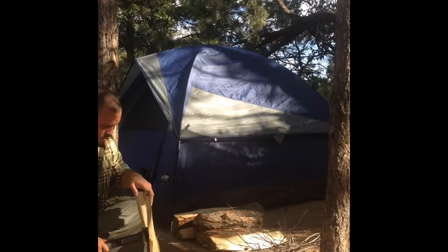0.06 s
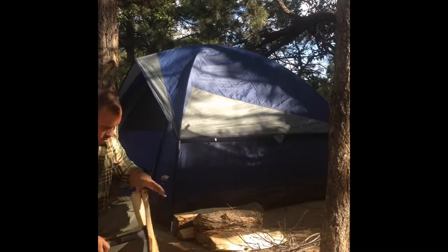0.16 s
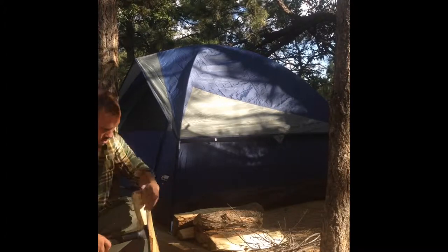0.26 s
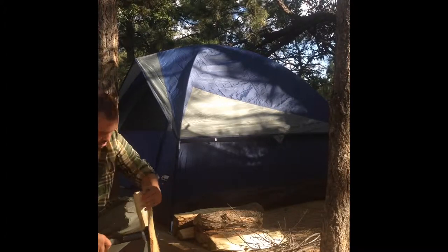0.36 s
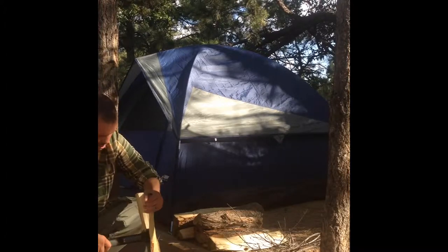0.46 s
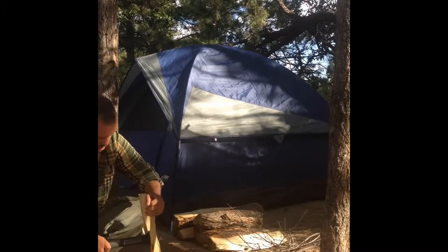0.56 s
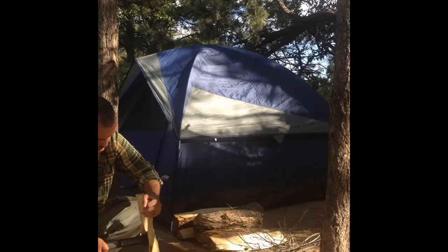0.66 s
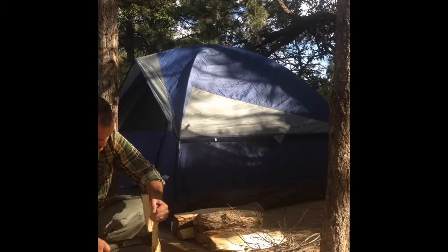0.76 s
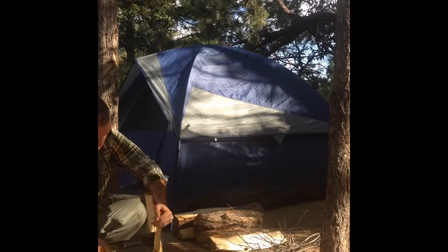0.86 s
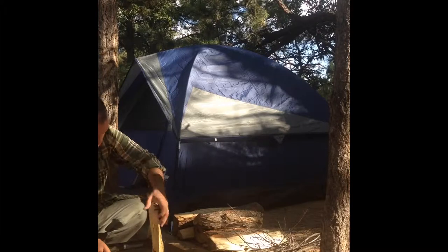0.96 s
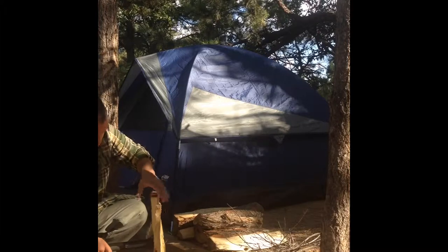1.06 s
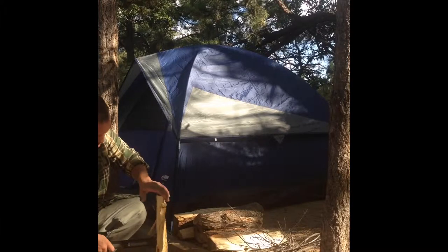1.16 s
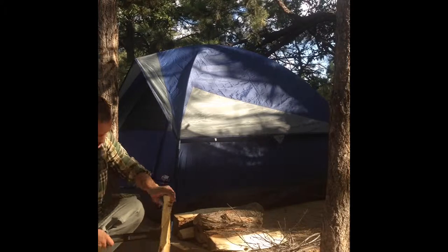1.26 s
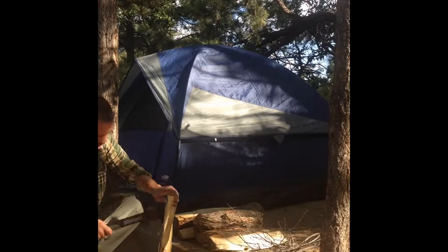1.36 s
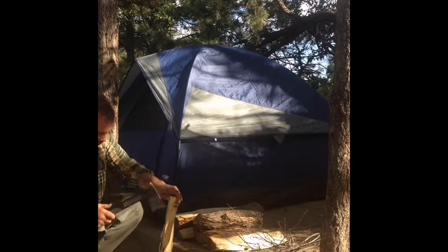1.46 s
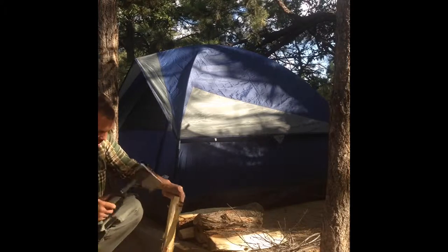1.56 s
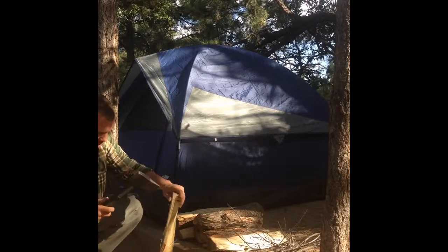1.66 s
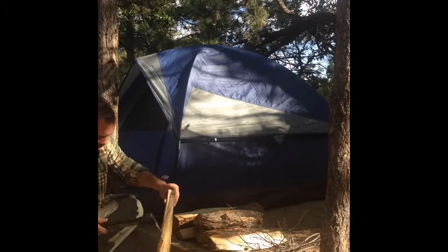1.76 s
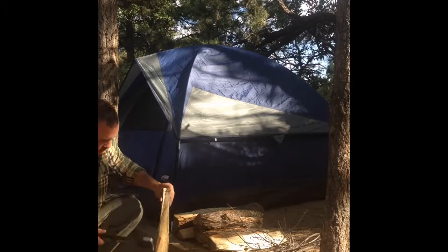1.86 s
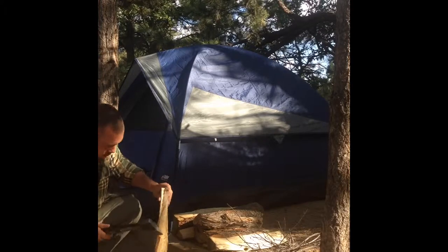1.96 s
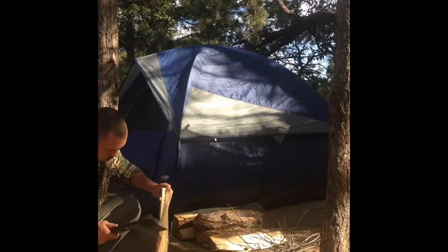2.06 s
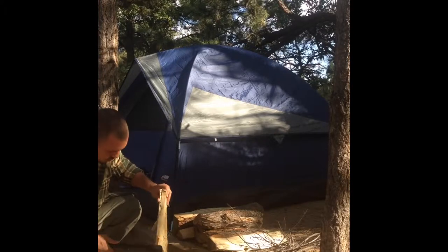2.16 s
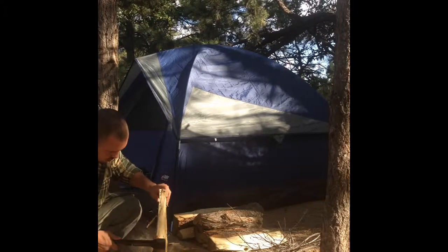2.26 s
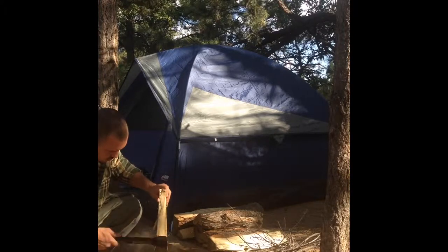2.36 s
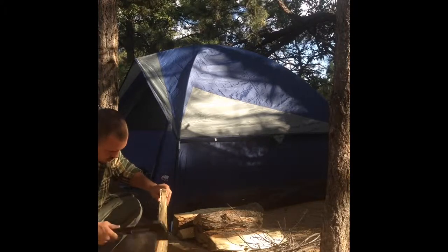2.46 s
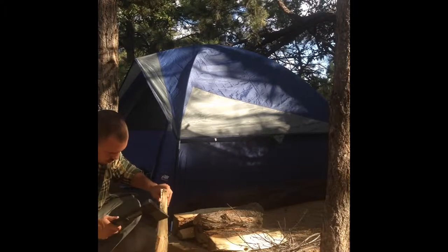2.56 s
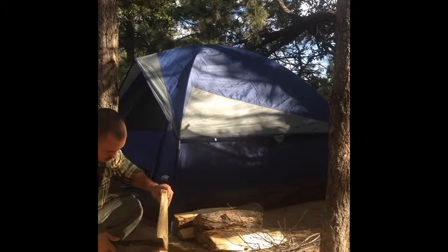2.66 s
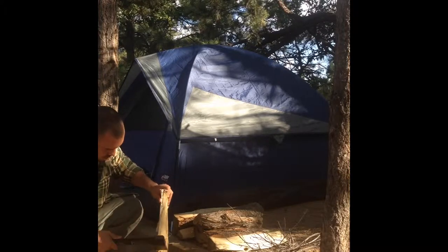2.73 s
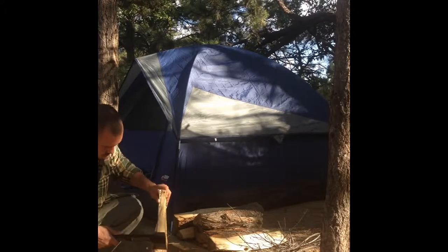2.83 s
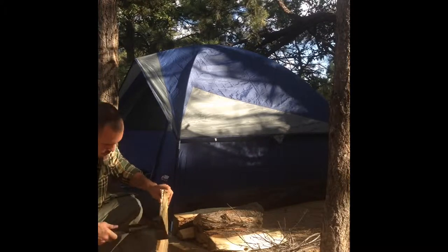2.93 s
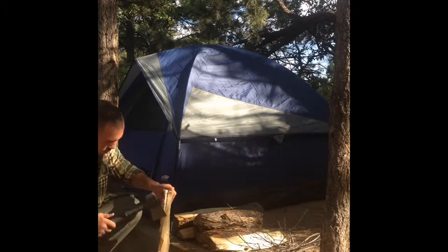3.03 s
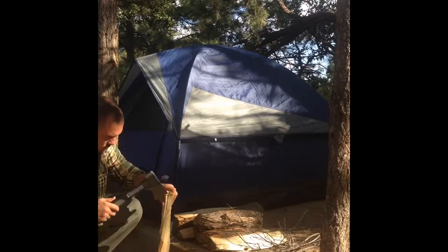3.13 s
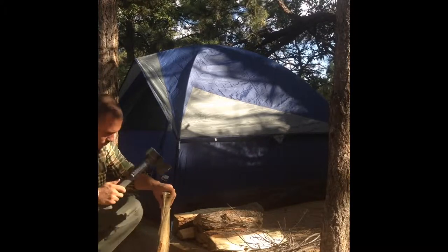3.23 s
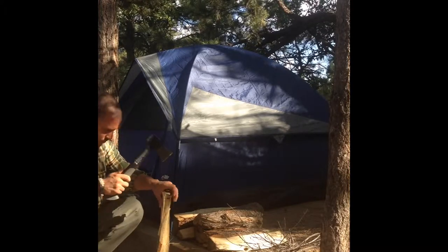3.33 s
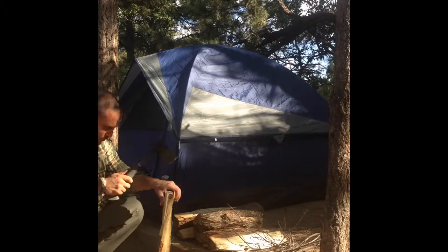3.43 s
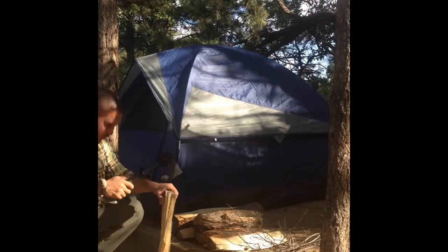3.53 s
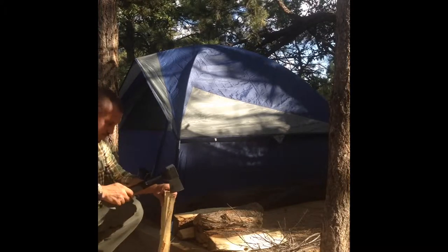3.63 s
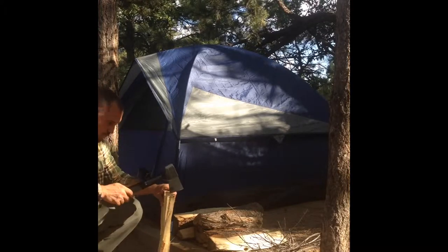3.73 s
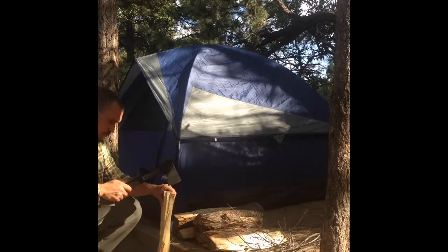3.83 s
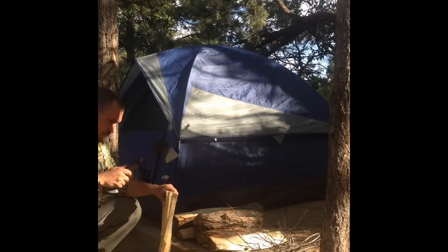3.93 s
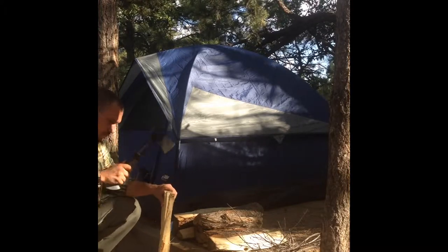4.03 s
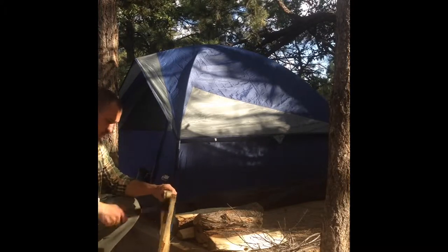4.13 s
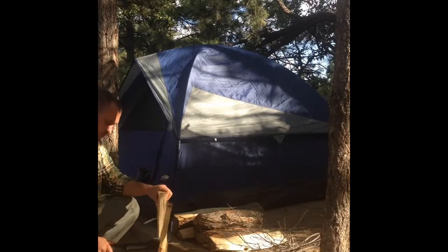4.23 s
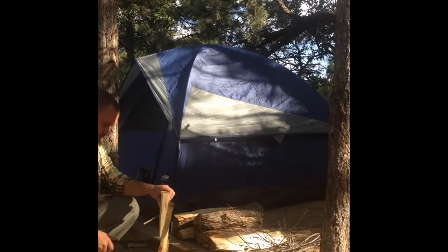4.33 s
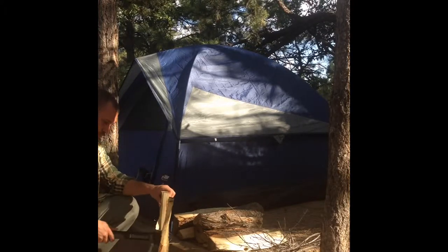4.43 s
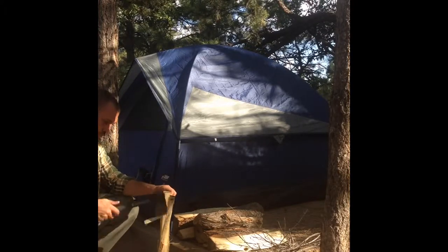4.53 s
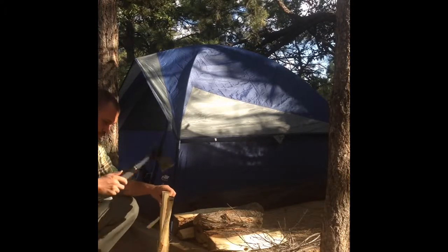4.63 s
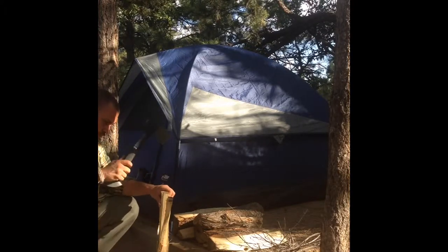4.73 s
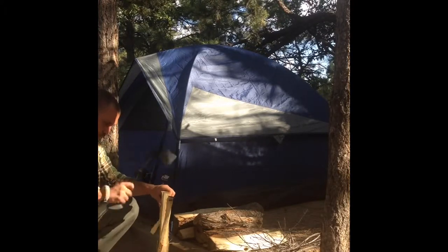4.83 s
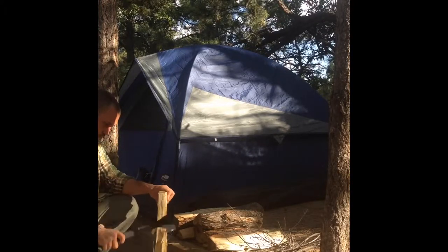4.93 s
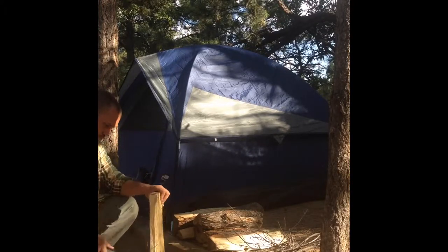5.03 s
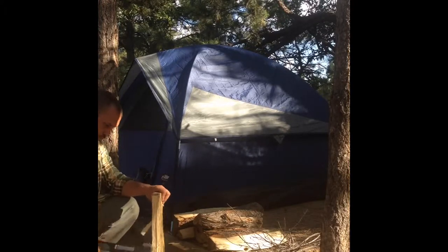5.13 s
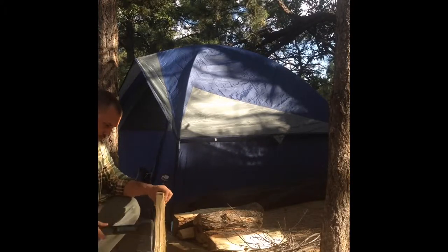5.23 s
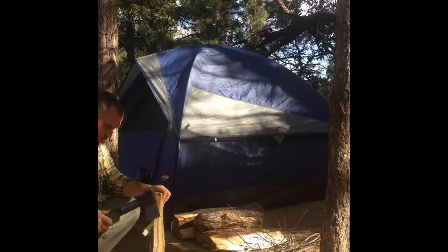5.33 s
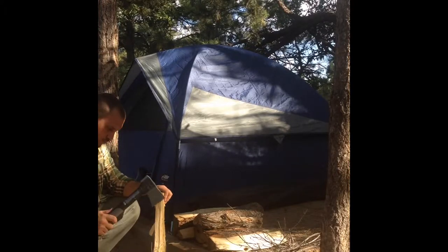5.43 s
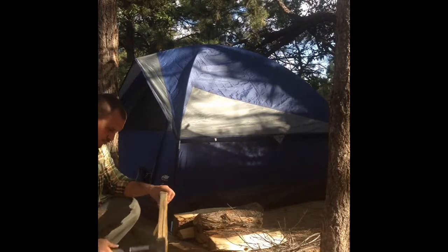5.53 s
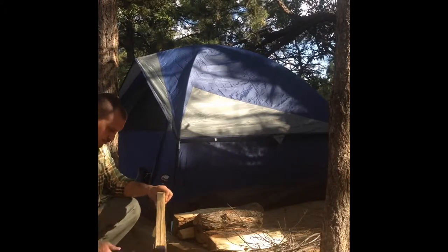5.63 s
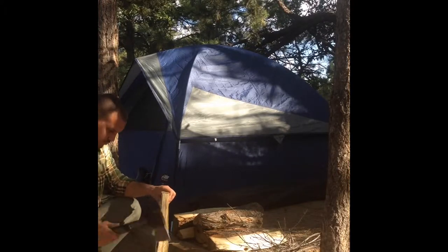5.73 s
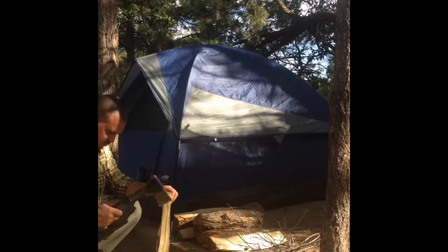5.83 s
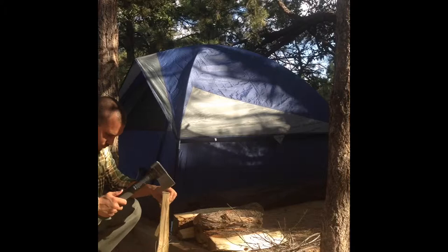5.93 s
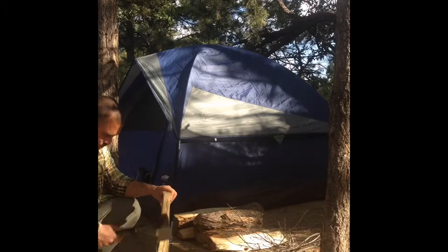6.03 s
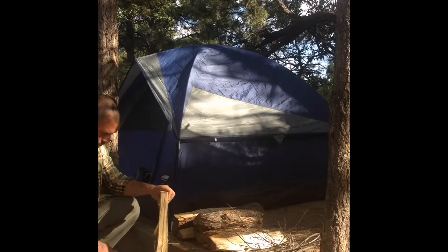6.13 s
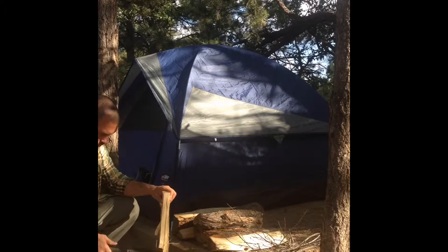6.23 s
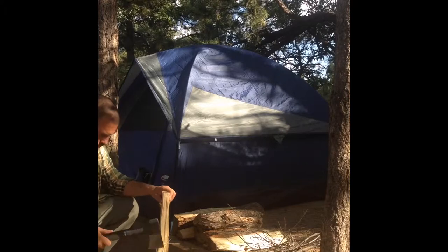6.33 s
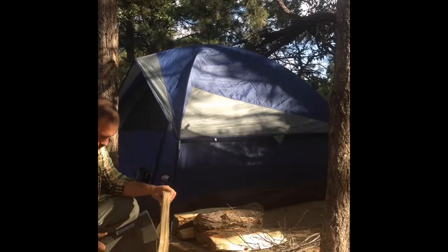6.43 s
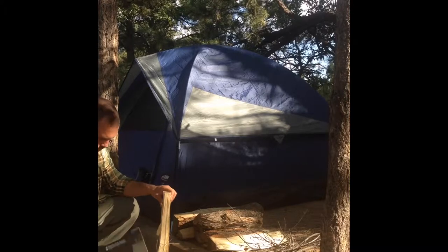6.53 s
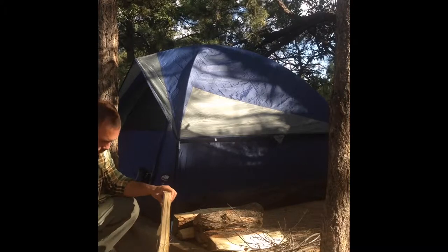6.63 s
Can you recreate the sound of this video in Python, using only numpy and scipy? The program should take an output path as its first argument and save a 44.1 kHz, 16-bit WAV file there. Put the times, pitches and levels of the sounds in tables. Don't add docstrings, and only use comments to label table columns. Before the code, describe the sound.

A quiet forest camp heard from a few metres away through one microphone. Low, dull road wash and thin generator hum run throughout, very faint. From 0 to 2 seconds a far engine revs up, peaks near 0.8 and falls away, while hands and dry needles rustle and small bark ticks cluster around 0.5 to 1.4. At 2.23 a hatchet hits the held stick with a loud, bright double crack; at 2.77 comes another equally hard, woodier knock. A pause follows, with a small tick at 3.72. Further blows land at 4.25, 4.99, 5.65 and 6.17, less loud; the one at 4.99 trails crackling slips and the last has a hollow woody tone. Each is a few milliseconds of splitting fibres over a short damped ring and soft soil thud, with brief tearing and slight tree echoes. Another faint engine passes at 4.4 to 5.7; ticks close the scene.

```python
import sys
import numpy as np
from scipy import signal
from scipy.io import wavfile
from scipy.ndimage import uniform_filter1d

SR = 44100
rng = np.random.default_rng(int(sys.argv[2]) if len(sys.argv) > 2 else 0)


def undo_db(level):
    steps = np.asarray(level, float) / 20
    return 10 ** steps


def transcribe(signal):
    frames = np.atleast_2d(signal).T
    limited = np.clip(frames, -1, 1)
    pcm = np.round(limited * 32767).astype(np.int16)
    wavfile.write(sys.argv[1], SR, pcm)


N = 295024


def evened(x):
    return x / np.sqrt(np.mean(x ** 2) + 1e-20)


def read(points, hz):
    f, value = np.transpose(points)
    return np.interp(np.log(hz + 1), np.log(f + 1), value)


def add(mix, s, sound):
    part = mix[round(s * SR):][:len(sound)]
    part += sound[:len(part)]


def ring(x, hz, width_hz):
    r = np.exp(-np.pi * width_hz / SR)
    return (1 - r) * signal.lfilter([1, 0, -1], [1, -2 * r * np.cos(2 * np.pi * hz / SR), r * r], x)


def wander(rate_hz):
    t = np.arange(N // 64 + 2) * 64 / SR
    drift = np.zeros(len(t))
    for f in rate_hz * np.geomspace(0.05, 1, 20):
        drift += np.sin(2 * np.pi * (f * t + rng.random())) / np.sqrt(f)
    return np.interp(np.arange(N) / SR, t, evened(drift))


def snaps(per_s, spread_db):
    size_db = spread_db * np.minimum(rng.exponential(1, N), 3)
    happens = rng.random(N) < per_s / SR
    return undo_db(size_db) * rng.choice([-1, 1], N) * happens


def coloured(x, points):
    hz = abs(np.fft.fftfreq(2048, 1 / SR))
    log_gain = np.log(undo_db(np.maximum(read(points, hz), -100)))
    taps = np.fft.ifft(np.exp(np.conj(signal.hilbert(log_gain)))).real[:1024]
    return signal.oaconvolve(x, taps)[:len(x)]


# f/Hz, level/dB
WASH_COLOUR = [(15, -72), (25, -36), (61, -3.5), (86, 0), (178, -6.5), (204, -5.5), (322, -11.5),
               (349, -12), (378, -15.5), (804, -11), (970, -10.5), (2360, -29.5), (15500, -37)]
# t/s, rumble level/dB
ROAD = [
    (0, -0.5),
    (1.5, 2),
    (2.3, -2),
    (2.9, 0.5),
    (4.4, -0.3),
    (4.8, 4),
    (5.8, 4),
    (6.69, 2),
]


def wash():
    wash_db = -51.5
    frames, hz = N // 512 + 5, np.fft.rfftfreq(2048, 1 / SR)
    real, imaginary, patches = rng.standard_normal((frames, 1025, 3)).T
    patches = evened(uniform_filter1d(uniform_filter1d(patches, 3, 0), 12, 1))
    t = np.arange(frames) * 512 / SR
    rumble_sway = np.interp(t, np.arange(N) / SR, wander(3))
    tyre_sway = np.interp(t, np.arange(N) / SR, wander(3))
    traffic_db = np.interp(t, *np.transpose(ROAD))
    rumble_db = traffic_db + 0.94 * rumble_sway
    tyres_db = 1.22 + 0.02 * tyre_sway - 0.301 * traffic_db
    low = 1 / (1 + (hz[:, None] / 230) ** 4)
    road = 1 / (1 + (hz[:, None] / 2200) ** 4)
    change_db = low * (rumble_db + 1.3 * patches) + (road - low) * (tyres_db + 0.99 * patches)
    spectra = (real + 1j * imaginary) * undo_db(read(WASH_COLOUR, hz)[:, None])
    steady = signal.istft(spectra, nperseg=2048, noverlap=1536)[1]
    level = undo_db(wash_db) / np.sqrt(np.mean(steady ** 2))
    return level * signal.istft(spectra * undo_db(change_db), nperseg=2048, noverlap=1536)[1][:N]


# f/Hz, level/dB
GENERATOR = [(93.4, -66), (233, -63), (279, -66)]
HUM_A, HUM_B, HUM_C, HUM_D = 186, 323.5, 375, 560
# middle t/s, length/s, peak level/dB, f/Hz
GUSTS = [(3.93, 0.41, -53.5, HUM_A), (6.0, 0.24, -59, HUM_A), (6.55, 0.37, -53.5, HUM_A),
         (3.1, .4, -62, HUM_B), (4.02, 0.75, -56, HUM_B), (6.445, .3, -65.5, HUM_B),
         (0.38, 1.15, -61, HUM_C), (2.3, .8, -61.5, HUM_C), (6.457, 0.32, -61, HUM_C),
         (0.025, 0.5, -61.5, HUM_D), (1.77, .35, -61, HUM_D), (3.3, 0.95, -65, HUM_D),
         (6.0, 0.18, -65, HUM_D), (6.546, 0.32, -61, HUM_D)]


def generator():
    t = np.arange(N) / SR
    turns = np.cumsum(1 + 0.002016 * wander(2.3)) / SR
    steady, gusts = np.zeros(N), np.zeros(N)
    for hz, db in GENERATOR:
        steady += undo_db(db + 1.5 * wander(2.5)) * np.sin(2 * np.pi * hz * turns)
    for middle, length, db, hz in GUSTS:
        swell = np.exp(-2 * ((t - middle) / length) ** 2)
        gusts += undo_db(db) * swell * np.sin(2 * np.pi * hz * turns)
    return steady + undo_db(1.5 * wander(2.66)) * gusts


# multiple of the firing rate, level/dB
ENGINE_ORDERS = [(.5, -6.5), (1, 0.5), (1.5, -6), (2, -21)]
# firing f/Hz, extra level/dB
DRONE = [(108, 13.5), (126, 5), (141, -27.5)]


def engine(rows):
    s, hz, db = np.transpose(rows)
    t = np.arange(N) / SR
    firing = np.interp(t, s, hz)
    turns = np.cumsum(firing * (1 + 0.003 * wander(9.6))) / SR
    drone_db = np.interp(firing, *np.transpose(DRONE))
    tones = np.zeros(N)
    for order, order_db in ENGINE_ORDERS:
        tone_db = order_db + (order == 1.5) * drone_db + 1.5 * wander(6)
        tones += undo_db(tone_db) * np.sin(2 * np.pi * order * turns)
    return np.sqrt(2) * undo_db(np.interp(t, s, db, -99, -99)) * tones


# t/s, firing f/Hz, level/dB
REVVING = [
    (0, 152, -59.5),
    (0.39, 153.1, -54.5),
    (0.7, 171.7, -43.5),
    (0.86, 174.7, -45.5),
    (1.08, 168.6, -50.5),
    (1.38, 140.8, -52),
    (1.62, 128.1, -51.5),
    (1.9, 116, -56),
    (2.1, 102.1, -68),
]
# t/s, firing f/Hz, level/dB
PULLING = [
    (2.42, 105.8, -70),
    (2.5, 114.8, -62),
    (2.62, 140.3, -59.5),
    (2.74, 164, -57),
    (2.8, 168, -69.5),
]
# t/s, firing f/Hz, level/dB
CRUISING = [
    (4.4, 165, -71),
    (4.66, 158.2, -56),
    (4.982, 170.6, -58.5),
    (5.45, 167, -56.5),
    (5.7, 147.4, -58),
]


def far_engines():
    return engine(REVVING) + engine(PULLING) + engine(CRUISING)


# t/s, level/dB
RUSTLE = [
    (0, -63),
    (.91, -63.5),
    (1.2, -66),
    (3.1, -63.5),
    (4.75, -67.5),
    (5.05, -58.5),
    (5.5, -66),
    (6.69, -64),
]


def rustle():
    grains = snaps(2500, 3.0)
    texture = evened(ring(grains, 3000, 720) + 0.28 * ring(grains, 3000, 1382))
    level_db = np.interp(np.arange(N) / SR, *np.transpose(RUSTLE))
    return undo_db(level_db - 7.5 + 2.5 * wander(13)) * texture


def crack(db, low_hz, high_hz, high_db, ms):
    noise = rng.standard_normal(1500)
    t = np.arange(len(noise)) / (SR * ms / 1000)
    slips = noise * abs(noise) ** 1.9 * (1 - np.exp(-t / 0.17)) * np.exp(-t)
    slips[round(SR * ms / 4000)] -= 3.0
    low = evened(ring(ring(slips, low_hz, 1240), low_hz, 1240))
    high = evened(ring(ring(slips, high_hz, 2100), high_hz, 2100))
    edge = evened(ring(slips, 4700, 3500))
    broad = evened(ring(slips, 2500, 2700))
    bright = high + undo_db(7.0 - 11.0 * ms) * edge
    sound = low + undo_db(high_db) * bright + undo_db(1.5) * broad
    return undo_db(db) * sound / abs(sound).max()


# t/s, peak level/dB, low ring f/Hz, brightness/dB
TICKS = [(0.5394, -47, 1950, 1), (0.664, -37.5, 1740, -16), (0.829, -51, 2600, -12), (0.8494, -48, 1830, 5),
         (0.889, -43, 1740, 2), (0.9503, -41.5, 3440, 4), (1.004, -36.5, 2900, 3), (1.068, -42.5, 2500, 4),
         (1.111, -41.5, 2630, 9), (1.1383, -47, 3050, -6), (1.3365, -47, 2815, -4), (1.419, -46, 3000, -3),
         (1.729, -47.5, 2603, -10), (1.78, -46, 1610, 2), (1.906, -49, 3240, -10),
         (2.6524, -47, 2980, -6.5), (3.7232, -34.5, 2490, -15), (3.7494, -56, 1630, 9.5),
         (4.4408, -44.5, 2840, -6), (4.531, -42.5, 2900, -9), (5.244, -39.5, 2370, -15),
         (6.0691, -47, 1920, 6.5), (6.133, -40.5, 2320, 4), (6.232, -45, 2220, 3), (6.257, -38, 3100, 3),
         (6.294, -32, 2460, -14), (6.403, -38.5, 2700, 2.5), (6.577, -44.5, 1630, -18.5),
         (3.7218, -33.5, 4800, -3)]


def bark_ticks():
    out = np.zeros(N)
    for s, db, low_hz, bright_db in TICKS:
        add(out, s, crack(db, low_hz, high_hz=4460, high_db=bright_db, ms=2.3))
    return out


def knock(db, hz, t60, rise_ms):
    noise = rng.standard_normal(9000)
    t = np.arange(len(noise)) / SR
    shape = (1 - np.exp(-t * 1000 / rise_ms)) ** 2 * undo_db(-60 * t / t60)
    rough = 0.3 * evened(ring(ring(noise, hz, 0.7 * hz), hz, 0.7 * hz))
    sound = shape * (np.sin(2 * np.pi * hz * t) + rough)
    return undo_db(db) * sound / abs(sound).max()


# t/s, peak level/dB, f/Hz, time to fall 60
# dB/s
GROUND = [
    (2.233, -31.5, 134, 0.036),
    (2.769, -32, 144, 0.12),
    (3.728, -57, 94.2, .19),
    (4.272, -42.5, 134, 0.15),
    (4.994, -40, 114, 0.83),
    (5.675, -41, 138, 0.075),
    (6.169, -36, 130, .13),
]


def ground_thuds():
    out = np.zeros(N)
    for s, db, hz, t60 in GROUND:
        add(out, s, knock(db, hz, t60, rise_ms=3.2))
    return out


# t/s, peak level/dB, f/Hz, time to fall 60 dB/s
STICK_LOW = [(2.23, -18, 302, .058), (2.766, -17, 260.7, 0.029), (3.727, -44.5, 354, 0.031),
             (4.27, -20.5, 343, .035), (4.992, -21, 389, 0.011), (5.102, -37.5, 353, 0.016),
             (5.64, -30, 351, 0.16), (5.668, -26, 322, 0.021), (5.689, -34.5, 293, 0.062),
             (6.162, -18.5, 326, 0.022), (6.291, -35, 272, 0.03)]
# t/s, peak level/dB, f/Hz
STICK_MID = [(2.232, -49, 458), (2.771, -14, 476), (4.27, -23, 477), (4.274, -20, 550), (4.994, -28.5, 470),
             (5.243, -45, 598), (5.637, -22.5, 580), (5.67, -26, 575), (5.674, -25.5, 650),
             (6.163, -43, 458), (6.163, -11.5, 598), (6.294, -36, 670)]
# t/s, peak level/dB, f/Hz
STICK_TOP = [(0.664, -58, 1140), (2.2308, -27, 960), (2.2466, -21.5, 1460), (2.7704, -21.5, 1115),
             (2.7752, -24, 1318), (3.724, -44, 1040), (4.2443, -34, 1515), (4.2696, -17.5, 1320),
             (4.9826, -32, 990), (4.991, -19, 1380), (4.996, -25.5, 1490), (5.639, -21, 1385),
             (5.6703, -29, 1380), (6.1624, -19, 930), (6.1751, -25.5, 1150)]


def stick_rings():
    lag_s = 0.001
    out = np.zeros(N)
    for s, db, hz, t60 in STICK_LOW:
        add(out, s + lag_s, knock(db, hz, t60, rise_ms=1.3))
    for s, db, hz in STICK_MID:
        add(out, s + lag_s, knock(db, hz, t60=0.02, rise_ms=1))
    for s, db, hz in STICK_TOP:
        add(out, s, knock(db, hz, t60=0.013, rise_ms=0.99))
    return out


# f/Hz, level/dB
FIBRES = [(590, -33.5), (1000, -3.5), (1630, -9), (2010, -3), (2710, 0), (4380, -5), (8170, -29.5),
          (12000, -40.5), (15600, -59.5), (22000, -120)]
# t/s, start level/dB, time to fall 60 dB/s, extra treble/dB
CREAKS = [(.625, -60, .3, 0), (.82, -56.5, .25, 0), (.9, -58, 0.39, 7), (1.72, -60, 0.56, 2.5),
          (2.269, -47.5, 0.52, 3), (2.8, -46.5, 0.27, -11), (3.721, -50.5, 0.17, 4), (4.224, -43, .12, 5),
          (4.236, -42, 0.16, 0), (4.249, -34.5, 0.2, -5.5), (5.06, -41.5, 0.38, 8), (5.621, -51, 0.16, 5),
          (5.645, -37, 0.2, -1.5), (5.659, -32.5, .12, 9), (6.2, -49, 0.56, 11), (6.294, -51, 0.078, -3)]


def tearing(breaks):
    grains = evened(coloured(snaps(4000, 4.0), FIBRES) * undo_db(2.0 * wander(150)))
    treble = evened(np.gradient(np.gradient(grains)))
    tears = [(s, db - 30.5 - 0.57 * bright_db, 0.078, 8.5 + 0.6 * bright_db)
             for s, db, _, bright_db, _ in breaks]
    out, t = np.zeros(N), np.arange(SR // 3) / SR
    for s, db, t60, treble_db in tears + CREAKS:
        at = slice(round(s * SR), round(s * SR) + len(t))
        blend = grains[at] + undo_db(treble_db - 12) * treble[at]
        onset = 1 - np.exp(-t / 0.00084)
        add(out, s, undo_db(db - 60 * t / t60) * onset * blend)
    return out


# t/s, peak level/dB, low ring f/Hz, brightness/dB, snap length/ms
BREAKS = [(2.2317, -8.5, 2820, -27.5, 1.6), (2.246, 2.5, 2560, -2, 1.65), (2.2572, -17, 2810, -7, 1),
          (2.7682, -1, 2760, -14, 2.5), (2.775, -20, 1950, -10, 2.3), (2.779, 1, 3220, 0, 1.25),
          (2.782, -27, 2970, -4, 1.2), (4.246, -21.5, 2530, 3, 1.7), (4.2691, -6, 2400, -7.5, 3.16),
          (4.9811, -12, 2170, -25, 2.9), (4.9934, -3, 3210, -3, 1.32), (4.9988, -10.5, 2110, -16, 1.3),
          (5.02, -17, 2900, 7, 0.49), (5.0252, -7, 2820, 4, 0.99), (5.0913, -26.5, 2650, -1, 3.2),
          (5.6388, -12.5, 3020, 3, 1.9), (5.663, -25, 2340, 8, 3.1), (5.6699, -10, 1990, -5.5, 1.72),
          (6.1611, -6.5, 2280, -26.5, 4.2), (6.1641, -6.5, 3500, -18, 1.9), (6.171, -17, 3420, -6, 1.6),
          (6.1734, -12, 3470, -4, 1.1)]
# t/s, peak level/dB, low ring f/Hz
SLIPS = [(4.2328, -32, 2710), (4.252, -36, 3710), (4.2635, -44, 2990), (4.2775, -31, 2283),
         (5.001, -34, 1970), (5.0277, -20, 2480), (5.0355, -21, 2320), (5.044, -24.5, 2770),
         (5.048, -29, 2680), (5.1338, -40, 3050), (5.6191, -36, 3540), (5.6564, -36, 2810),
         (5.6764, -41, 2230), (5.696, -29, 3030), (6.1804, -28, 3310)]


def fibre_cracks():
    out = np.zeros(N)
    slips = [(*row, -6.5, 2.9) for row in SLIPS]
    for s, db, low_hz, bright_db, ms in BREAKS + slips:
        high_hz = 2900 + 0.52 * low_hz
        add(out, s, crack(db, low_hz, high_hz, bright_db, ms))
    return out


# f/Hz, time to fall 60 dB/s
TREES = [(150, 0.44), (400, 0.17), (1000, 0.34), (2500, 0.034), (5000, 0.14), (10000, .09)]
# f/Hz, level/dB
TREES_COLOUR = [(100, 0.5), (300, 2), (900, -12.5), (2700, 2.5), (5000, 4), (11000, -10)]


def trees(x):
    taps = np.zeros(SR // 2)
    at = np.arange(200, len(taps) - 20, 20)
    taps[at + rng.integers(0, 20, len(at))] = rng.choice([-1., 1.], len(at))
    hz, t, spectra = signal.stft(taps, SR, nperseg=256)
    fade_db = read(TREES_COLOUR, hz)[:, None] - 60 * t / read(TREES, hz)[:, None]
    tail = signal.istft(spectra * undo_db(fade_db), SR, nperseg=256)[1]
    return signal.fftconvolve(x, tail / np.linalg.norm(tail))[:N]


# f/Hz, level/dB
AIR = [(20, -24.5), (60, 12.5), (120, 4.5), (4000, 0.5), (6000, -7.5), (8000, -12), (11000, -27),
       (16000, -28.5)]


def wood():
    struck = bark_ticks() + ground_thuds() + stick_rings() + fibre_cracks()
    echoed = struck + undo_db(-23.5) * trees(struck)
    return coloured(echoed, AIR) + tearing(BREAKS)


def scene():
    return (wash() + generator() + far_engines() + rustle() + wood())[None]


def band_limit(x):
    return signal.sosfilt(signal.butter(12, 15250, fs=SR, output="sos"), x)


def record(dry):
    knee, limit = 0.7, 0.97
    heard = signal.sosfilt(signal.butter(2, 38, "highpass", fs=SR, output="sos"), dry)
    over = np.maximum(abs(heard) - knee, 0)
    rounded = (limit - knee) * np.tanh(over / (limit - knee))
    heard = heard - np.sign(heard) * (over - rounded)
    return band_limit(heard)


dry = scene()
out = record(dry)
transcribe(out)
```